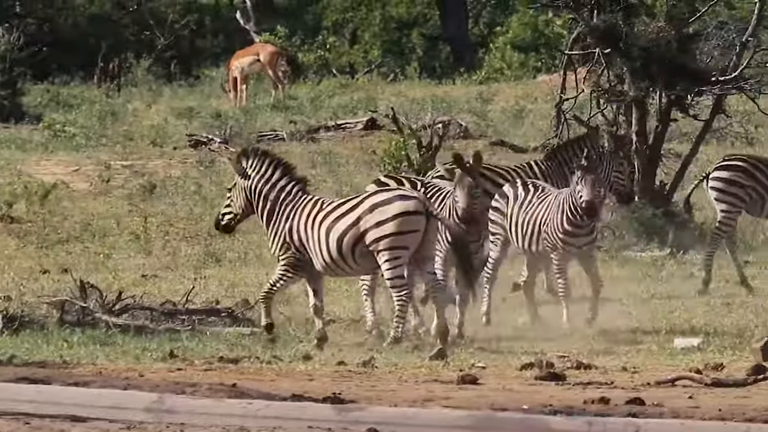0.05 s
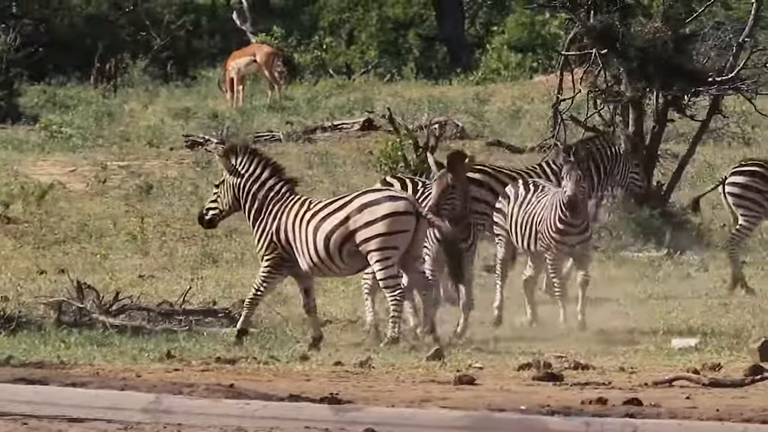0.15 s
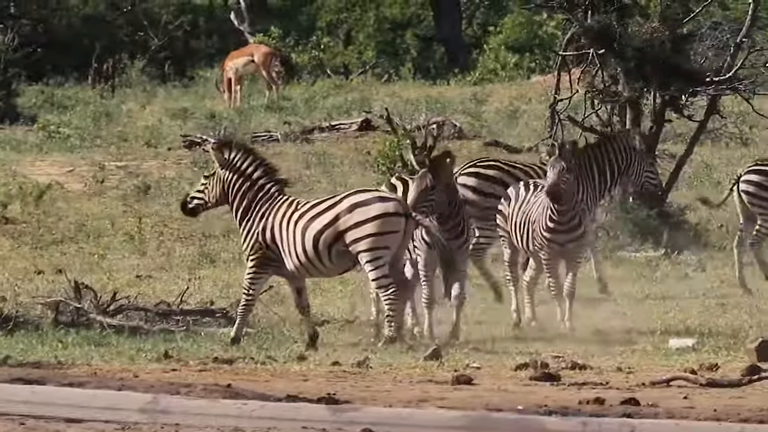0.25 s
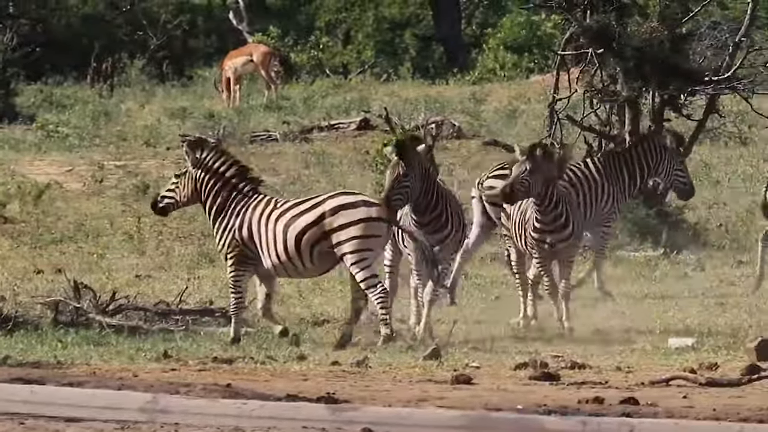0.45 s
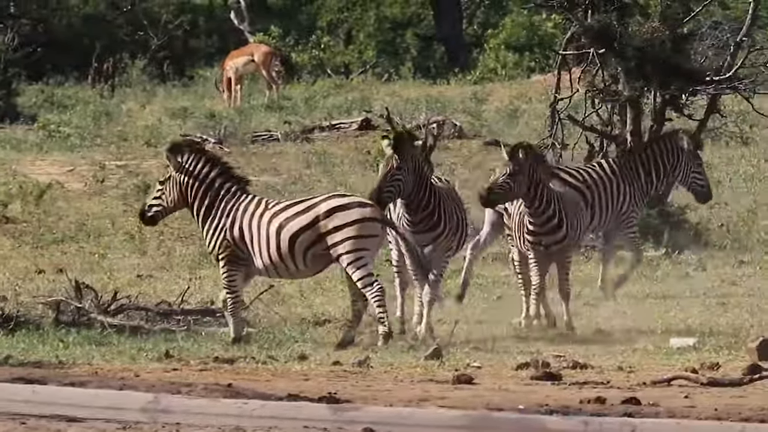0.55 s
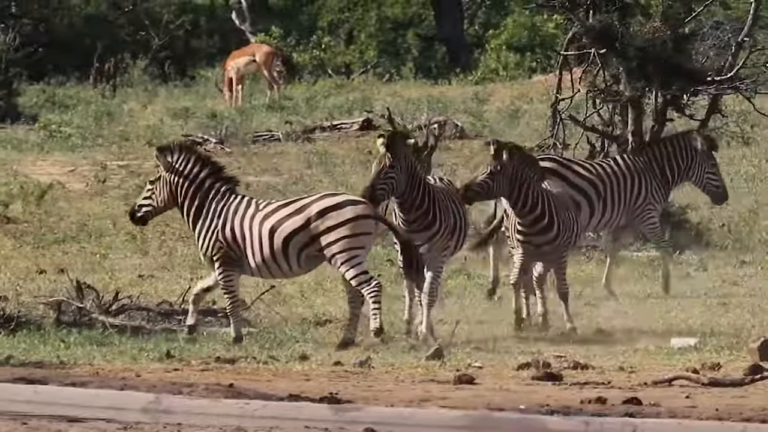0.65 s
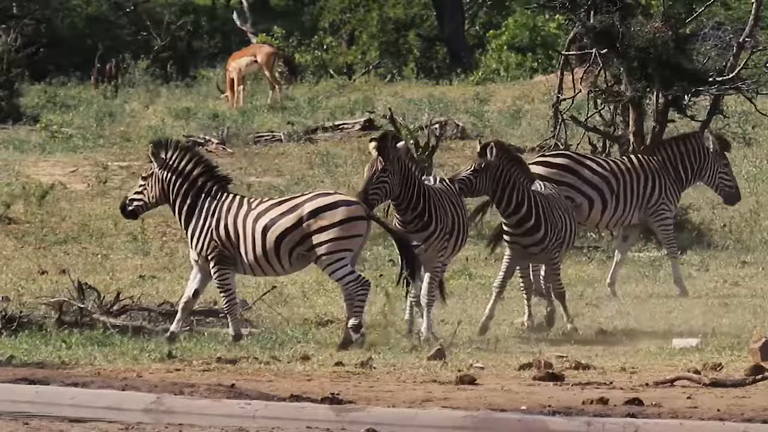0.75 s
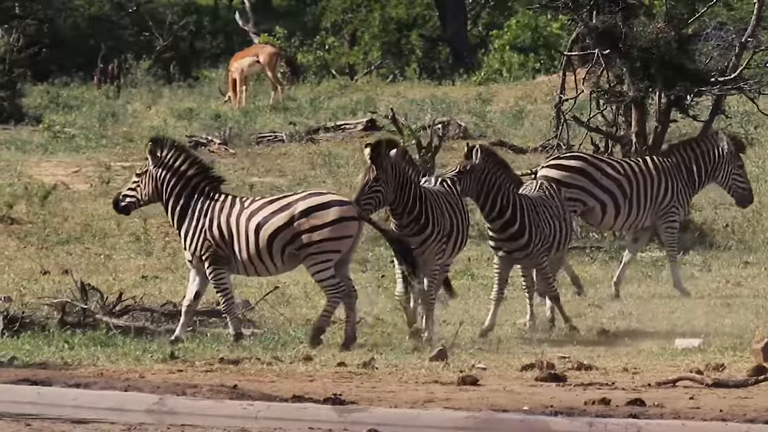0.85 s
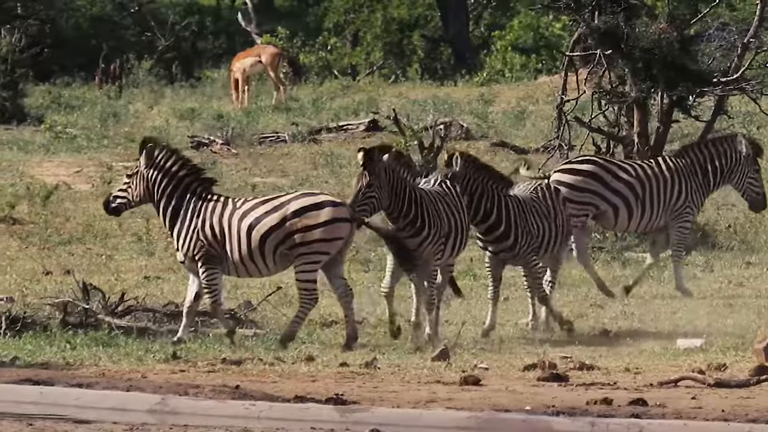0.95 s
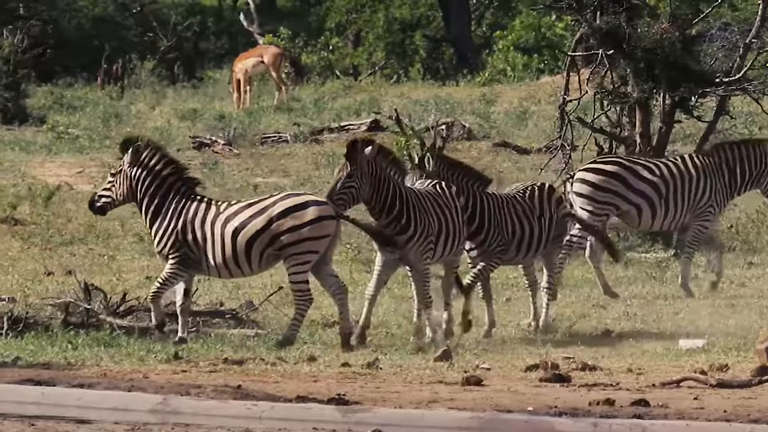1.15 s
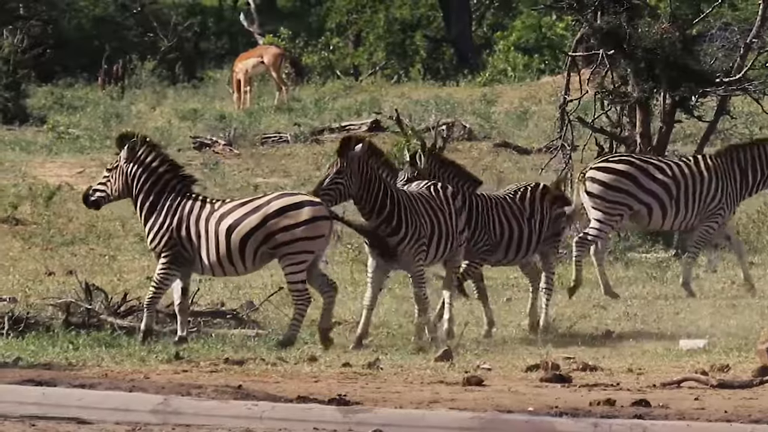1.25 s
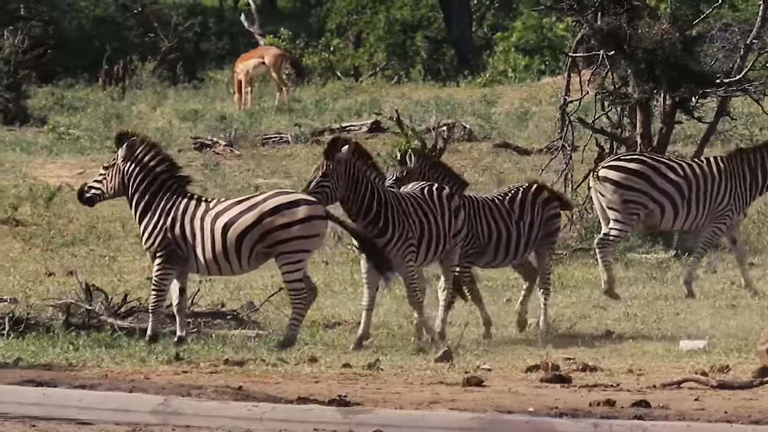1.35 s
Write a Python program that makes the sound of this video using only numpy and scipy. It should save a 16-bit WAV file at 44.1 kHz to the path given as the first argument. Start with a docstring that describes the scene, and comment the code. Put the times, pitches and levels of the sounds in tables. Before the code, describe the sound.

A high clear whistling call arches up and sags over grassland, amid bird chatter and rustling grass

```python
"""Whistling call on open grassland

A high clean whistle of three partials arches up and sags, and echoes off the trees.
Birds around it: a quick two-voiced warble, short gliding chatter notes, a low cooing trill, a faint
hoot and a dry rattle of noise puffs through resonances. A twig snaps softly.
Beneath lie rustling grass, a distant wash and the microphone's hiss, all made of coloured noise."""
import sys
import numpy as np
from scipy import signal
from scipy.io import wavfile
from scipy.ndimage import uniform_filter1d

SR = 44100
rng = np.random.default_rng(int(sys.argv[2]) if len(sys.argv) > 2 else 0)


def natural_amplitude(level_db):
    """Convert a level in decibels to a linear amplitude factor, elementwise."""
    exponent = np.asarray(level_db, float) / 20
    return 10 ** exponent


def int16_out(signal):
    """Quantize to a 16-bit WAV file."""
    q = np.round(np.clip(np.atleast_2d(signal).T, -1, 1) * 32767)
    wavfile.write(sys.argv[1], SR, q.astype(np.int16))


N = 61739  # scene length in samples


def evened(x):
    """Scales to rms 1."""
    return x / np.sqrt(np.mean(x ** 2) + 1e-20)


def add(mix, s, sound):
    """Mixes a sound in at a time in seconds, cutting off what overruns the end."""
    part = mix[round(s * SR):][:len(sound)]
    part += sound[:len(part)]


def tone(hz, order=1):
    """One partial of a pitch curve, rms 1."""
    return np.sqrt(2) * np.sin(2 * np.pi * order * np.cumsum(hz) / SR)


def curve(points):
    """Turns (seconds, dB) points into gain over the whole scene."""
    s, db = np.transpose(points)
    return natural_amplitude(np.interp(np.arange(N) / SR, s, db))


def bands(x, table):
    """Sum of two-pole resonances, each applied twice."""
    out = 0
    for hz, width, db in table:
        b, a = signal.iirpeak(hz, hz / width, SR)
        once = signal.lfilter(b, a, x)
        out = out + natural_amplitude(db) * signal.lfilter(b, a, once)
    return out


def flutter(samples, smooth, rows=1):
    """Random wavering, faster for smaller smooth (averaging length in samples), rms 1 over all rows."""
    return evened(uniform_filter1d(rng.standard_normal((rows, samples)), size=smooth, axis=1))


def noise(colour, patchy_db):
    """Coloured noise, rms 1, whose level drifts in patches across time and pitch."""
    frames, hz = N // 128 + 5, np.fft.rfftfreq(512, 1 / SR)
    a, b, patches = rng.standard_normal((frames, 257, 3)).T
    patches = uniform_filter1d(patches, size=6, axis=0)
    patches = evened(uniform_filter1d(patches, size=10, axis=1))
    f, db = np.transpose(colour)
    shape_db = np.interp(np.log(hz + 1), np.log(f), db)[:, None]
    z = (a + 1j * b) * natural_amplitude(shape_db + patchy_db * patches)
    return evened(signal.istft(z, nperseg=512, noverlap=384)[1][:N])


# Colour of the microphone's hiss. Each row: frequency in Hz, relative level in dB.
HISS_COLOUR = [(100, -80), (440, -24), (1070, -6), (14400, -3.5), (15700, -6.5)]


def hiss():
    """Separate steady noise at each of the two microphone ports."""
    level_db = -53.5
    return natural_amplitude(level_db) * np.array([noise(HISS_COLOUR, patchy_db=-0.8), noise(HISS_COLOUR, patchy_db=2.1)])


# Colour of the distant wash. Each row: frequency in Hz, relative level in dB.
WASH_COLOUR = [(30, -43), (245, -31), (474, -8.5), (839, 1.5), (2240, -4.5), (2880, -3.5), (3300, -11.5),
               (5570, -11), (7000, -21), (9100, -18), (15400, -120)]


def wash():
    """Distant broad noise, mostly centred, with a faint part in opposite phase at the two ports."""
    level_db, side_db = -51, -22.0  # the side is relative to the centre
    centre = natural_amplitude(level_db) * noise(WASH_COLOUR, patchy_db=1.0)
    side = natural_amplitude(level_db + side_db) * noise(WASH_COLOUR, patchy_db=-5.0)
    return centre + side * [[1], [-1]]


# Swells of the grass. Each row: time in seconds, level in dB.
RUSTLE_SWELLS = [(0, -46), (.1, -53), (.34, -56.5), (.4, -51), (.52, -58.5), (.6, -73), (.7, -49.5),
                 (.84, -67.5), (1.1, -46.5), (1.4, -71)]
# Colour of the grass. Each row: frequency in Hz, relative level in dB.
RUSTLE_COLOUR = [(700, -86), (1200, -11), (2200, -6), (3600, -7), (6500, -21.5), (12000, -32)]


def rustle():
    """Grass as patchy coloured noise that swells and fades."""
    return curve(RUSTLE_SWELLS) * noise(RUSTLE_COLOUR, patchy_db=3.0)


# Twig cracks. Each row: start in seconds, drive in dB ahead of the resonances.
SNAPS = [(0.288, -20.5), (.296, -17)]
# Resonances of the wood. Each row: centre in Hz, width of one pass in Hz, gain in dB.
SNAP_BANDS = [(1343, 200, -1.5), (2080, 2040, -7), (4340, 270, -4.5)]


def snaps():
    """Soft short cracks of a twig: noise bursts ringing in the wood."""
    peak_s = .0015  # rise time of each burst
    x, t = np.zeros(N), np.arange(400) / SR / peak_s
    for s, db in SNAPS:
        add(x, s, natural_amplitude(db) * t * np.exp(1 - t) * rng.standard_normal(400))
    return bands(x, SNAP_BANDS)


# A faint low tone. Each row: start in seconds, length in seconds, level in dB ahead of the swell.
HOOT = [(0.877, 0.0494, -55.5)]


def hoot(start, length, db):
    """A soft low tone of steady pitch that swells and fades."""
    pitch_hz = 585
    swell = np.hanning(round(length * SR))
    return start, natural_amplitude(db) * swell * tone(np.full(len(swell), pitch_hz))


# Course of the rattle. Each row: time in seconds, gain of the clicks in dB, gain of the rasp in dB.
RATTLE = [(.975, -70, -65), (1.005, -48, -43), (1.012, -36, -43), (1.12, -36, -41), (1.237, -37, -46),
          (1.245, -48, -46), (1.325, -46, -46), (1.35, -65, -60)]
# Resonances of the rattle. Each row: centre in Hz, width of one pass in Hz, gain in dB.
RATTLE_BANDS = [(3400, 900, -1), (5480, 700, 3), (7100, 450, -5)]


def rattle():
    """Slightly uneven clicks with short puffs through fixed resonances; the lowest also rasps between them."""
    first_s, clicks_per_s, puff_s = .979, 51.7, .0015
    slip_s, uneven_db = .0008, 1.8  # random spread of click times and strengths
    t = np.arange(N) / SR - first_s
    slip, size = rng.standard_normal((N, 2))[(t * clicks_per_s + .5).astype(int)].T
    phase = (t + slip_s * slip) % (1 / clicks_per_s)  # seconds since the last click
    since, air = phase / puff_s, rng.standard_normal(N)
    clicks = 14. * (np.diff(phase, prepend=0) < -.01)
    puffs = clicks + (since * np.exp(1 - since) + .25) * air
    grain = natural_amplitude(4 * flutter(N, smooth=150)[0])
    rows = np.array(RATTLE)
    clicking = curve(rows[:, :2]) * bands(natural_amplitude(uneven_db * size) * puffs, RATTLE_BANDS)
    rasp = curve(rows[:, ::2]) * bands(grain * air, RATTLE_BANDS[:1])
    return clicking + rasp


# Cooing trills. Each row: middle of the first blip in seconds, list with each blip's level in dB
# ahead of its swell.
COOS = [(.321, [-50, -52]), (.835, [-49, -46, -47, -50, -49, -47, -46, -46, -49, -51, -51, -48, -48, -53])]


def coo(first, k, db):
    """Blip k of a trill, soft and sagging; the trill slows and sinks as it goes on."""
    length_s, sag = 0.019, 0.16  # sag is the share of pitch lost within a blip
    gap_s, slowing_s = .0295, .00034
    pitch_hz, fall_hz_per_s = 951.4, 262
    u = np.linspace(0, 1, round(length_s * SR))
    late = gap_s * k + slowing_s * k ** 2
    hz = (pitch_hz - fall_hz_per_s * late) * (1 + sag * (.5 - u))
    return first + late - length_s / 2, natural_amplitude(db) * np.sin(np.pi * u) * tone(hz)


# Chatter notes. Each row: start in seconds, length in seconds, start and end of the straight glide
# in Hz ahead of the arch, level in dB ahead of the swell.
NOTES = [(.003, 0.021, 3850, 3860, -49.5), (0.023, 0.069, 2400, 2318, -48), (0.051, 0.056, 1934, 1857, -49),
         (.132, 0.03, 1846, 1730, -51.5), (0.163, 0.015, 2850, 3400, -49), (0.18, 0.027, 2720, 2600, -47),
         (0.282, 0.016, 3600, 4500, -52), (0.355, 0.032, 1423, 1340, -53), (0.386, 0.023, 2968, 3096, -41),
         (0.398, .018, 1528, 1397, -48.5), (0.427, .022, 2650, 1840, -45),
         (0.485, 0.027, 2120, 1620, -46.5), (.65, 0.018, 1918, 2250, -50.5),
         (.658, .018, 2890, 2800, -41.5), (0.676, 0.026, 1852, 1840, -46.5),
         (0.704, 0.0089, 2900, 2670, -47), (0.724, 0.0453, 1843, 1683, -53.5),
         (.755, 0.071, 2920, 2846, -54.5), (0.895, 0.018, 1909, 1900, -47), (0.908, 0.026, 1775, 1620, -48),
         (1.078, 0.015, 2760, 2770, -38), (1.074, 0.02, 2192, 2203, -44.5), (1.094, 0.02, 1843, 1770, -48),
         (1.113, 0.034, 2654, 2520, -59), (1.15, 0.044, 1926, 1820, -58.5),
         (1.373, 0.026, 2943, 2720, -51.5)]


def note(start, length, hz0, hz1, db):
    """A short arched glide whose strength and pitch waver; low notes carry their octave."""
    arch, waver_depth, shake_depth = .07, .28, .01  # shares of pitch, strength and pitch
    octave_db, octave_below_hz = -2, 1910
    u = np.linspace(0, 1, round(length * SR))
    waver, shake = flutter(4000, smooth=200, rows=2)[:, :len(u)]
    waver = 1 + waver_depth * waver
    hz = (hz0 + (hz1 - hz0) * u) * (1 + arch * (np.sin(np.pi * u) - 2 / np.pi))
    hz = hz * (1 + shake_depth * shake)
    octave = (hz0 < octave_below_hz) * natural_amplitude(octave_db) * waver * tone(hz, order=2)
    return start, natural_amplitude(db) * np.sin(np.pi * u) ** .6 * waver * (tone(hz) + octave)


def warble():
    """Two voices: a fluttering tone swings fast between low and high; a lower one joins in quick pulses."""
    start_s, length_s, swings_per_s = .5435, .038, 84
    low_hz, span_hz, wobble_hz = 5700, 3100, 300
    swing_db, rough = -43, .6  # level ahead of throat and flutter, depth of the flutter
    peak_hz, peak_step_hz = 7050, 1450  # evenly spaced throat resonances
    pulse_start_s, pulse_length_s, pulses_per_s = .5595, .026, 212
    pulse_hz, pulse_db = 5660, -36.5  # middle pitch, level ahead of the pulsing
    t = np.arange(0, length_s, 1 / SR)
    high = .5 + .5 * np.cos(2 * np.pi * swings_per_s * t)
    roughness, wobble = flutter(len(t), smooth=36, rows=2)
    hz = low_hz + span_hz * high + wobble_hz * wobble
    throat = abs(np.cos(np.pi * (hz - peak_hz) / peak_step_hz))
    level = signal.windows.tukey(len(t), .1) * natural_amplitude(swing_db) * (1 + rough * roughness)
    y = np.pad(level * throat * tone(hz), (0, 400))
    t = np.arange(0, pulse_length_s, 1 / SR)
    fade = np.minimum((pulse_length_s - t) * 100, 1)
    pulses = abs(np.sin(np.pi * pulses_per_s * t)) * fade
    hz = pulse_hz * (1 + 0.016 * np.cos(2 * np.pi * swings_per_s * t))
    add(y, pulse_start_s - start_s, natural_amplitude(pulse_db) * pulses * tone(hz))
    return start_s, y


# Arch of the whistle. Each row: time in seconds, pitch in Hz ahead of smoothing, level of the first
# partial in dB ahead of the hoarseness, level of the second in dB.
WHISTLE = [(0.223, 2746, -57, -75), (.229, 2695, -35, -42.5), (0.242, 2854, -36.5, -32),
           (0.253, 2910, -33, -33.5), (0.278, 2931, -37, -29.5), (0.307, 2910, -31.5, -33),
           (0.373, 2804, -36.5, -35.5), (.394, 2757, -36, -47.5), (0.466, 2651, -39, -46),
           (0.488, 2626, -44, -53), (0.497, 2410, -49, -59)]


def whistle():
    """Three partials on one pitch arch; the first is clean but for one hoarse moment."""
    hoarse_s, hoarse_width_s, hoarse_depth = .39, .035, .35
    third_db = -65  # at its fullest
    s, hz, first, second = np.transpose(WHISTLE)
    t = np.arange(s[0], s[-1], 1 / SR)
    f = uniform_filter1d(np.interp(t, s, hz), size=350)
    moment = np.exp(-((t - hoarse_s) / hoarse_width_s) ** 2)
    hoarse = 1 + hoarse_depth * moment * flutter(len(t), smooth=40)[0]
    swell = np.sin(np.pi * (t - s[0]) / (s[-1] - s[0])) ** .5
    y = natural_amplitude(np.interp(t, s, first)) * hoarse * tone(f)
    y = y + natural_amplitude(np.interp(t, s, second)) * tone(f, order=2)
    return s[0], y + natural_amplitude(third_db) * swell * tone(f, order=3)


def field(x):
    """Close reflections from the ground and a thin long echo from the trees, nearly alike at both ports."""
    near_db, near_t60_s = -17, .05
    echo_db, echo_t60_s, echo_gap_s, echo_dull_hz = -20.5, 1.2, 0.013, 3630
    spread = 0.024  # difference between the ports
    t = np.arange(SR) / SR
    taps = rng.standard_normal((2, 2, SR)) * (rng.random((2, 2, SR)) < .05)  # sparse reflections
    near, far = taps[:, :1] + spread * taps[:, 1:] * [[1], [-1]]
    near = near * natural_amplitude(-60 * t / near_t60_s) * (t > .002)
    far = signal.lfilter(*signal.butter(2, echo_dull_hz, fs=SR), far)
    far = far * natural_amplitude(-60 * t / echo_t60_s) * (t > echo_gap_s)
    tail = natural_amplitude(near_db) * near / np.linalg.norm(near[0]) + natural_amplitude(echo_db) * far / np.linalg.norm(far[0])
    return x + signal.fftconvolve(x[None], tail, axes=1)[:, :N]


def scene():
    """All calls and the twig in the field, over grass and wash."""
    calls = snaps() + rattle()
    sounds = [hoot(*row) for row in HOOT]
    sounds += [coo(first, k, db) for first, levels in COOS for k, db in enumerate(levels)]
    sounds += [note(*row) for row in NOTES]
    sounds += [warble(), whistle()]
    for s, y in sounds:
        add(calls, s, y)
    return field(calls) + rustle() + wash()


def band_limit(x):
    """A steep low-pass at the top of the band."""
    return signal.sosfilt(signal.butter(12, 16760, fs=SR, output="sos"), x)


def record(dry):
    """A low cut on the scene, then each port's own hiss, then a steep band limit."""
    low_cut_hz, edge_hz = 160, 15760
    cut = signal.butter(2, low_cut_hz, "high", fs=SR, output="sos")
    limit = signal.firwin(511, edge_hz, window=("kaiser", 9), fs=SR)
    heard = signal.sosfilt(cut, dry) + hiss()
    mix = signal.oaconvolve(heard, limit[None], "same")
    return band_limit(mix)


dry = scene()
out = record(dry)
int16_out(out)
```